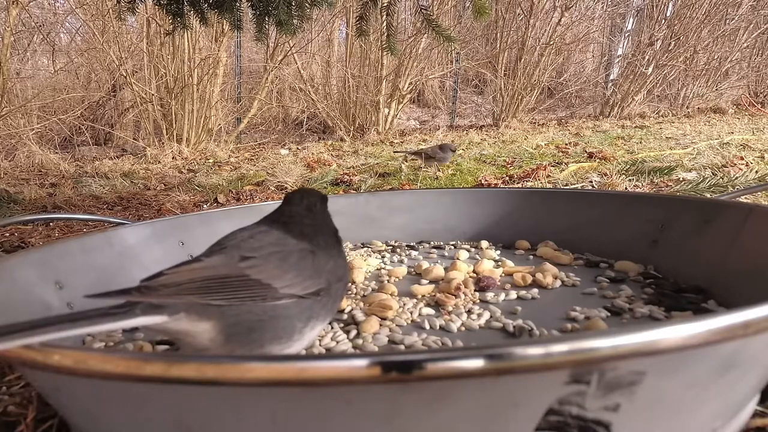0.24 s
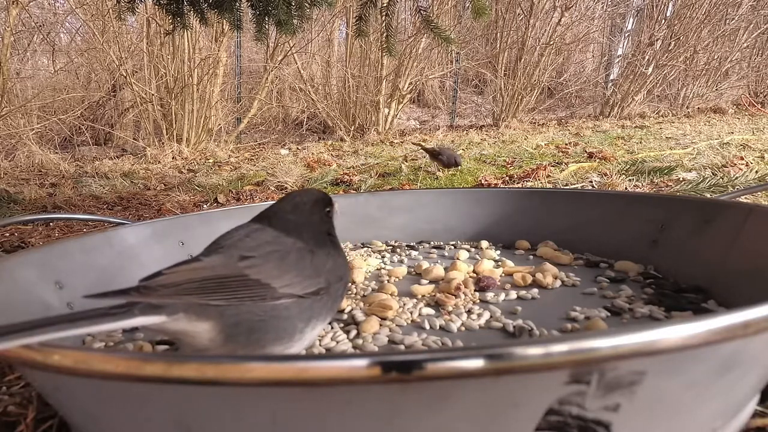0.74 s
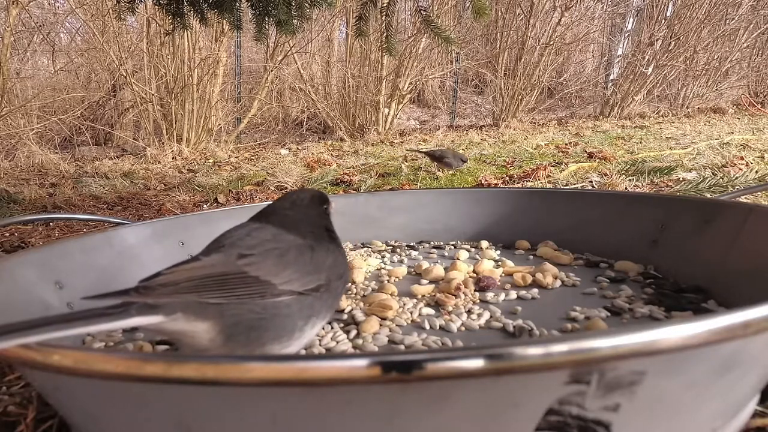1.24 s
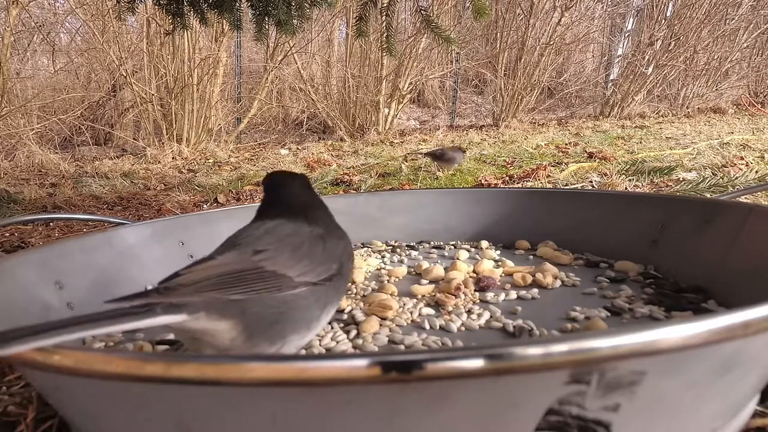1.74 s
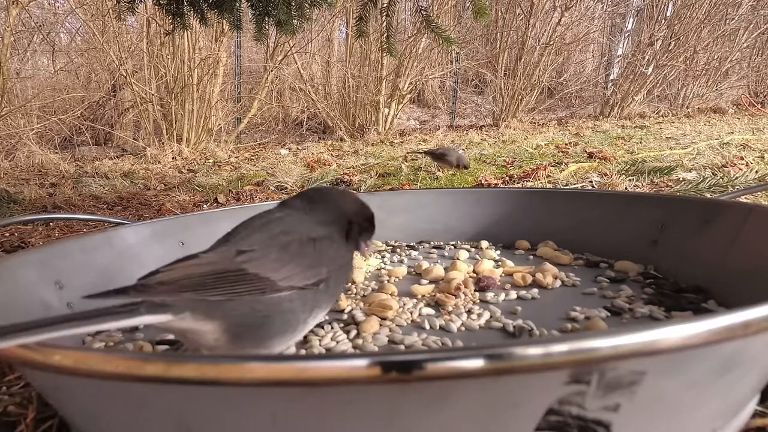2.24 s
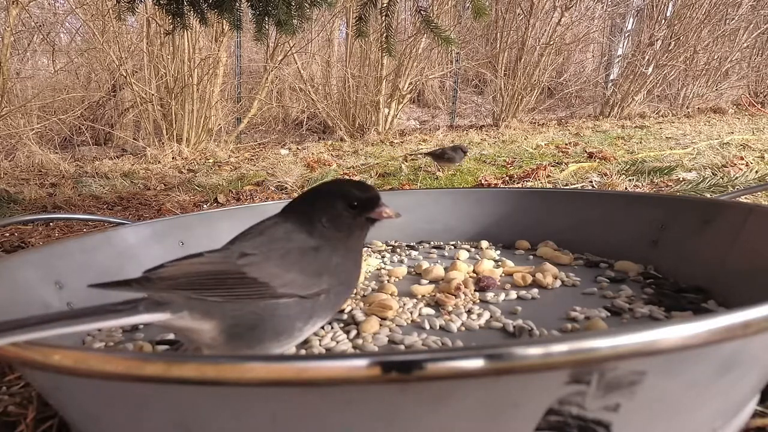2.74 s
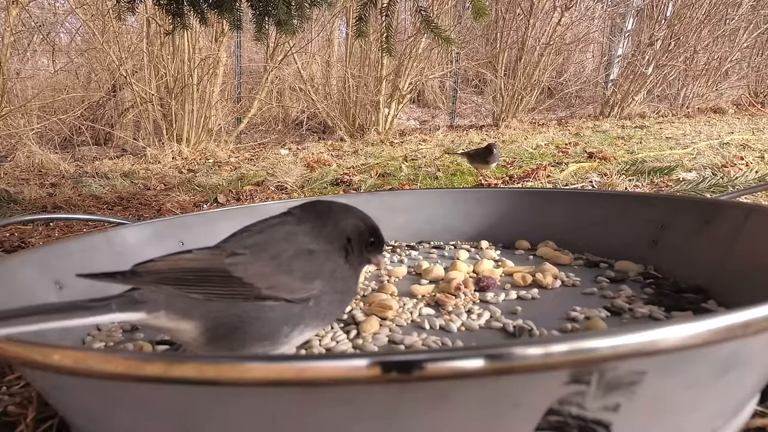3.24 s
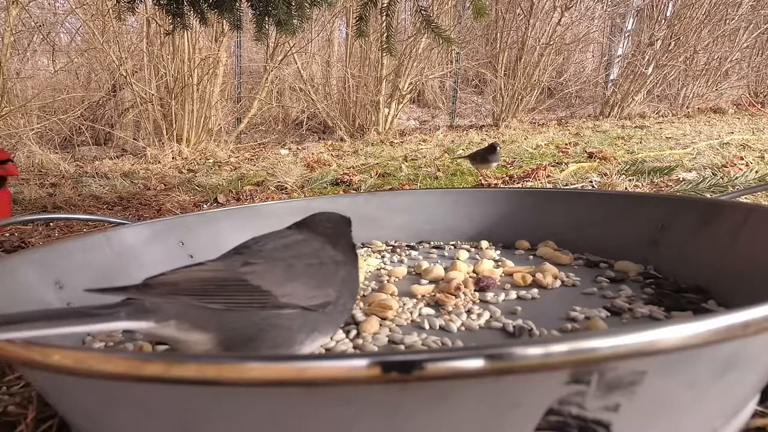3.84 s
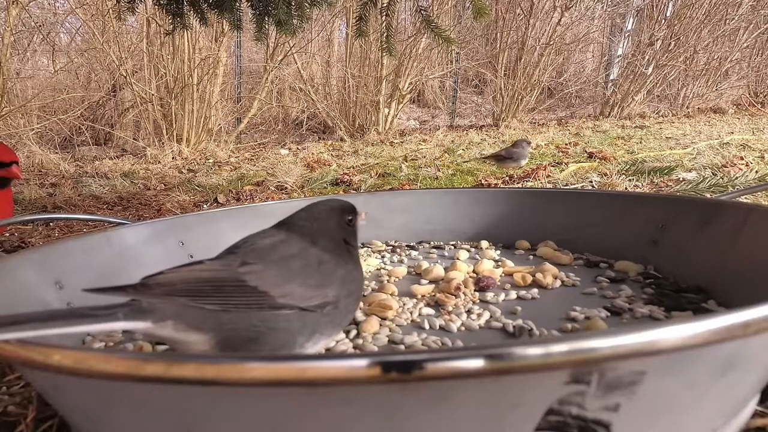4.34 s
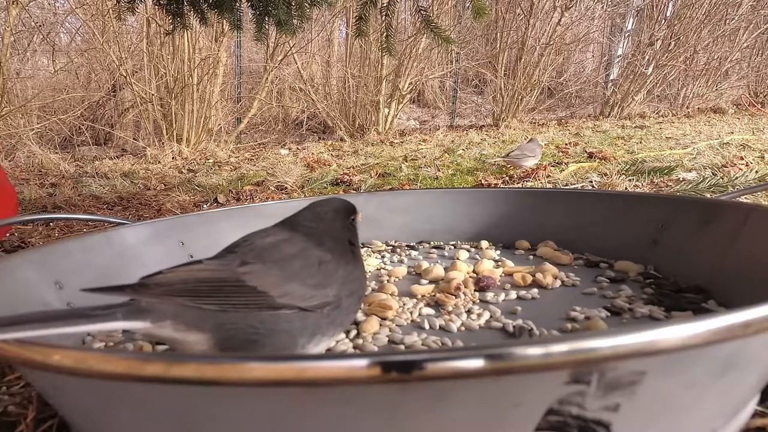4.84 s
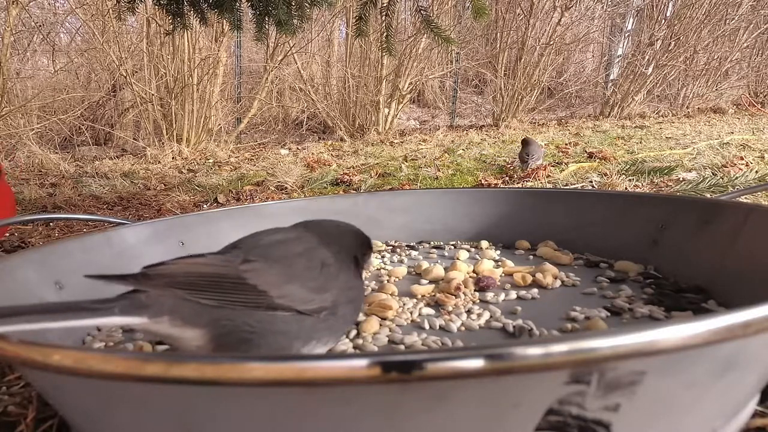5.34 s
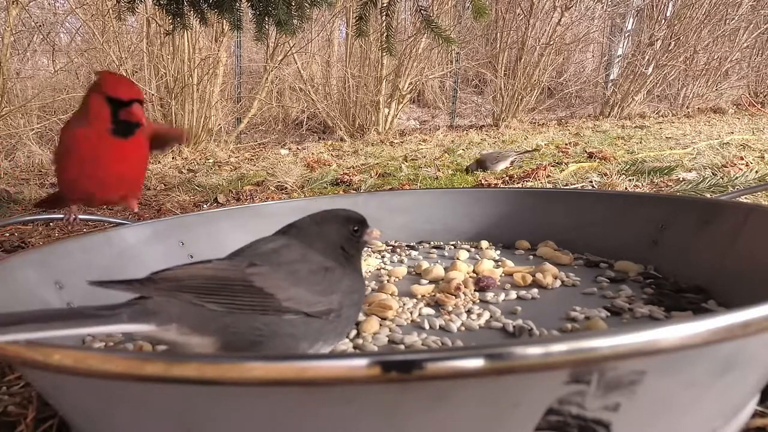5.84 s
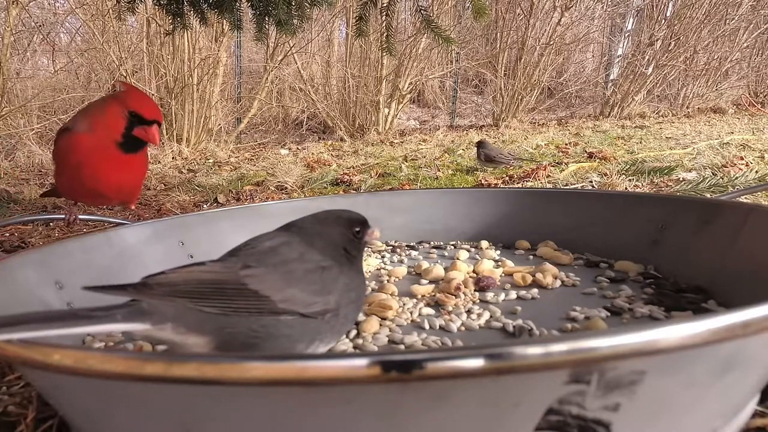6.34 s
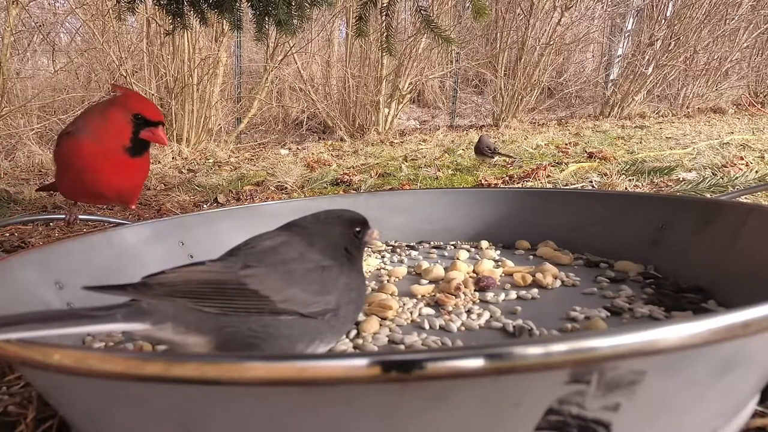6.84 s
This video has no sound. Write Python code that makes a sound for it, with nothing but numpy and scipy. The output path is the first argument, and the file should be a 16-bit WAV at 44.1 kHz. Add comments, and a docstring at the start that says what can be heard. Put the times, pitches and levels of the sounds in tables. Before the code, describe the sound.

Outdoors in a quiet yard, close stereo microphone. A small bird by a metal feeding bowl gives two sharp chips and two quick falling whistles, then seeds tick and rustle and the bowl is knocked once. More chips lead into a run of eight slurred whistles. A hard click cuts in, then final chips and one short buzzy warble from a second bird. Distant motor hum, road rumble and hiss continue underneath.

```python
"""Songbird at the feeding bowl

Close to a stereo microphone a songbird by a metal bowl sings sharp chips and down-slurred whistles, built as
harmonic stacks on gliding pitches; a second bird gives one buzzy warble, a whistle swinging fast in pitch.
Noise bursts and grains make ticks and rustle; damped modes ring the bowl when it is knocked once.
Behind: a distant motor hums in sine orders over road rumble, hiss and a thin whine; low noise swells at the end.
"""
import sys
import numpy as np
from scipy import signal
from scipy.io import wavfile
from scipy.ndimage import uniform_filter1d

SR = 44100
rng = np.random.default_rng(int(sys.argv[2]) if len(sys.argv) > 2 else 0)


def log_audio(samples):
    """Write samples as a 16-bit WAV file to the path given in sys.argv[1]."""
    # one column per channel
    frames = np.atleast_2d(samples).T
    # limit to full scale, then quantise
    limited = np.clip(frames, -1, 1)
    pcm = np.round(limited * 32767).astype(np.int16)
    wavfile.write(sys.argv[1], SR, pcm)


N = 312669

# Course of one slur and one chip. Each row: time after onset in s, pitch in Hz, fundamental in dB, overtones in dB.
SLUR_SHAPE = [(-.003, 6440, -10, -40), (-.001, 5970, 12, 2), (.002, 4200, 6, -3), (.006, 2400, 6.5, -6),
              (.012, 2063, -8.5, -1.5), (.026, 1890, -1.2, -4.5), (.058, 1712, -1.5, -5),
              (.071, 1591, -5, -6.5), (.09, 1090, -13, -14), (.099, 1020, -9.5, -17), (.105, 932, -28, -32)]
CHIP_SHAPE = [(-.002, 10730, -28, -50), (.0001, 9020, -0.5, -6), (.002, 6733, 4, 2), (.005, 3420, -5, 0),
              (.008, 1834, -27.5, -47), (.011, 1600, -14.5, -3), (.017, 1235, -25.5, -24),
              (.023, 1280, -52, -50)]
# Notes sung. Each row: onset in s, level in dB, time stretch, pitch factor at the start, pitch factor at the end,
# overtones in dB, overtone tilt in dB per order.
SLUR_NOTES = [(1.474, -36, 1, 1.02, 1.03, -0.5, -1), (1.6406, -35, .93, 1.004, 1.07, -0.7, -0.1),
              (3.8448, -35, .95, 0.98, 1.066, -2.3, 2.5), (4.0025, -34.5, .95, 0.99, 1.07, -0.5, 2),
              (4.1608, -33.5, .97, 0.97, 1.042, -1.2, 0.2), (4.3258, -33.5, .96, 0.99, 1.046, -1, .4),
              (4.5262, -36, 1, .99, 1.008, -7, -2), (4.6935, -34.5, 1.006, 0.99, 1.001, -4, -1),
              (4.8868, -36, 1.03, 0.96, 1.01, -4, -0.8), (5.0905, -36, 1.03, 0.98, 1.02, -1.5, 0.9)]
CHIP_NOTES = [(1.3159, -28, 1, 1.02, 1.16, -3, 5), (1.3907, -31, 1.2, 1.15, 0.98, 2.5, 3),
              (3.1657, -31, 0.97, 0.71, 1.22, -7.5, -3), (3.3208, -27, 0.96, .92, 1.1, -1.5, -1.1),
              (3.705, -31.5, .97, .98, 1.04, 4, -0.5), (3.7737, -30, 1.001, 0.96, 1.01, 3, 3),
              (5.9009, -28.5, 1, .98, 1.03, -10, .6), (5.9863, -26, .91, 1.01, 1.04, -.6, -2),
              (6.341, -30, 1.06, 0.86, 1.03, -1, -.4), (6.6754, -32.5, 0.97, 0.94, 1.02, 2, -1)]
# Balance of the overtones. Each entry: dB of order 2, 3, 4, 5; the fifth also serves the orders above.
SLUR_OVERTONES_DB = [-2.3, 3, -3.5, -3.5]
CHIP_OVERTONES_DB = [-6.5, -11, -23, -21]
# Depth of the overtones' wavering as the throat shifts. Entries: dB at the start, middle and end of a note.
WAVER_DB = [2.0, 2.5, 8.0]
# Throat and path to the microphone. Each row: frequency in Hz, gain in dB, left minus right in dB.
VOICE_COLOUR = [(900, 3.5, 4.5), (1930, -0.5, -4.5), (2600, -9.5, -4.5), (3270, -5, -1.5), (3870, 3.5, 5.5),
                (4730, -11.5, -3), (5250, -5, 2.5), (5650, -14, 2), (6000, -5, 1.5), (7560, -2.5, -3),
                (8240, 4.5, 15.5), (8890, -1.5, -9), (11600, -23.5, -19), (13900, -18, -4),
                (16200, -19, 13)]
# The singer shifts its perch. Each row: time in s, treble phase lead of the left channel in radians.
PERCH_LEAD = [(1.5, 1.08), (3.2, 0.64)]
# Echoes off bowl and ground, before the treble filter. Each row: delay in s, left in dB, right in dB.
SONG_ECHOES = [(.00043, -6, -9), (.002, -10, -12), (.0037, -18, -15)]
# Echoes of the warble, before the treble filter. Each row: delay in s, left in dB, right in dB.
WARBLE_ECHOES = [(.0009, -12, -14), (.0021, -16, -14)]
# Seed and claw ticks. Each row: start in s, peak in dB, pitch of the band in Hz, 60 dB decay in s,
# left minus right in dB.
SEED_TICKS = [(0.4217, -29.5, 3500, 0.0059, -2), (0.8462, -40.5, 7100, 0.016, -1.1),
              (1.189, -39.5, 5600, 0.011, 2), (2.562, -51.5, 2600, .024, -7), (2.684, -47, 3200, 0.022, -7),
              (2.734, -51, 2400, .015, -3), (2.826, -50.5, 3000, 0.012, -4),
              (2.8794, -50, 6020, 0.019, -1.5), (2.99, -45, 2400, 0.024, -1.5),
              (3.1008, -36, 6600, 0.031, 5), (3.122, -43.5, 5000, 0.031, .5),
              (3.2231, -46, 2714, 0.017, .5), (3.3024, -46, 8000, .02, 11), (3.3524, -47, 3100, 0.024, 2),
              (3.4232, -51.5, 8000, 0.009, 11), (4.9516, -15.5, 7620, 0.0017, 0.5),
              (5.8446, -49.5, 2480, 0.019, .1), (5.896, -37, 2500, 0.01, 3), (6.329, -45, 6000, .012, .1)]
# Knock on the bowl and its bounces. Each row: start in s, blow in dB, softening frequency of the contact in Hz.
BLOWS = [(3.4956, -20, 1500), (3.4982, -15.5, 700), (3.5023, -23, 6000), (3.5054, -36, 6000),
         (3.5115, -32, 3000)]
# Modes of the bowl. Each row: frequency in Hz, relative level in dB, 60 dB decay in s.
BOWL_MODES = [(355, -8, 0.075), (486, 3, 0.014), (720, 3, 0.01), (780, 1.5, 0.016), (970, 1, 0.013),
              (1085, -2, 0.044), (1190, 1.5, 0.032), (1430, -3, 0.033), (1585, -7, .03), (1914, 0, .03),
              (2400, 0, 0.04), (4200, -5, .04), (4400, 4, 0.042)]
# Rustle of seeds and leaves. Each row: time in s, level in dB.
RUSTLE_LEVEL = [(0, -79.5), (2.2, -75.5), (2.65, -65.5), (2.85, -75.5), (3.2, -62.5), (3.4, -73),
                (3.7, -69.5), (5.5, -76), (7.09, -77)]
# Distant motor. Each row: time in s, turning rate in Hz, level in dB, lift of the orders above the third in dB.
MOTOR_COURSE = [(0, 41.73, -55, 0), (2.96, 41.96, -54.5, -0.8), (4.2, 41.58, -57, 0.2),
                (6.1, 41.36, -59.5, 7.5), (6.78, 40.8, -58.5, 9), (7.0, 40.92, -58, 9.5)]
# Motor orders. Each row: multiple of the turning rate, relative level in dB.
MOTOR_ORDERS = [(2, -6.5), (3, 0), (4, -17), (5, -6.5), (6, -16.5), (7, -19.5), (9, -18)]
# Road rumble over time. Each row: time in s, level in dB.
ROAD_LEVEL = [(0, -60.5), (2.0, -60), (2.45, -58), (3.3, -61), (4.4, -57.5), (4.7, -60.5), (5.65, -58.5),
              (6.5, -61), (7.09, -59)]
# Spectra of road and hiss, relative. Each row: frequency in Hz, density in dB per Hz.
ROAD_COLOUR = [(12, -58), (20, -12), (32, -23), (56, -13.5), (125, -8.5), (167, -9.5), (214, -4),
               (250, -7.5), (389, -9), (540, -15), (2000, -35.5), (2600, -78), (4400, -120)]
HISS_COLOUR = [(590, -46), (1000, -3), (3900, -6), (4850, -8), (7070, -6.5), (12400, -6), (14900, -14),
               (15400, -15)]
# Likeness of the two channels in road and hiss. Each row: frequency in Hz, left-right correlation.
LIKENESS = [(60, 0.95), (130, 0.88), (290, 0.88), (640, 0.78), (1410, -0.16), (3100, -0.24), (6820, 0.4),
            (15000, 0.27)]
# Low rumble that swells. Each row: time in s, level in dB.
SWELL_LEVEL = [(0, -85), (6.6, -80), (6.88, -63), (7.0, -55), (7.09, -52)]

SLUR_PAN_DB, CHIP_PAN_DB = -1.5, -2.1   # left minus right
HIGH_OVERTONE_SLOPE_DB = -2.5           # per order above the fifth
RASP_DB = -12                           # airflow noise of the syrinx against the overtone course
LEAD_FULL_HZ = 3200                     # the left lead grows with frequency up to here
WARBLE_START_S, WARBLE_TOP_S, WARBLE_END_S = 6.1555, 6.1634, 6.249   # TOP: end of the opening glide
WARBLE_HITCH_S = 6.1737                 # one downswing turns back early
WARBLE_SWINGS_PER_S, WARBLE_SLOWING_PER_S2 = 125.3, 200
WARBLE_TOP_HZ, WARBLE_WANDER_HZ = 8540, 110
WARBLE_FIRST_HZ, WARBLE_FLOOR_HZ, WARBLE_SETTLE_S = 6280, 7100, 0.015   # the dips climb towards the floor
WARBLE_DB, WARBLE_DIP_DB, WARBLE_OCTAVE_DB, WARBLE_PUFF_DB = -22, -2.5, -27, -17
WARBLE_ATTACK_S, WARBLE_RELEASE_S = 0.011, 0.024
PATTER_FROM_S, PATTER_GAP_S, PATTER_COUNT = 2.47, .05, 5
PATTER_DB, PATTER_HZ, PATTER_T60_S, PATTER_PAN_DB = -55, 2800, 0.027, -14
RATTLE_DB, RATTLE_T60_S = -34, 0.073
SONG_WET_DB, WARBLE_WET_DB, BOWL_WET_DB = -6, -12, -5   # diffuse tail, before its treble filter
YARD_T60_S, YARD_LOW_HZ = .045, 2800
HISS_DB = -66.5
WHINE_HZ, WHINE_DB, WHINE_PAN_DB, WHINE_LEAD_RAD = 15704, -56, -7, 2.15
MAINS_HZ, WHINE_BUZZ = 60, .2           # rate and depth of the mains modulation
MIC_TOP_HZ, CUTOFF_HZ = 16100, 16650


def song(notes, shape, orders_db, pan_db):
    """The close singer: every note is a stack of nine harmonics on one glide, coloured by throat and path."""
    out = np.zeros((2, N))
    after, hz, first_db, rest_db = np.transpose(shape)
    waver = [np.minimum(drift(50), .6) for _ in range(9)]
    for s, level_db, stretch, start, end, over_db, tilt_db in notes:
        t = np.arange(after[0] * stretch, after[-1] * stretch, 1 / SR)
        glide = np.exp(np.interp(t / stretch, after, np.log(hz)))
        pitch = uniform_filter1d(np.linspace(start, end, len(t)) * glide, size=30)
        phase = 2 * np.pi * np.cumsum(pitch) / SR
        overtone_db = np.interp(t / stretch, after, rest_db)
        waver_depth = np.interp(t, np.linspace(t[0], t[-1], 3), WAVER_DB)
        perch_lead = np.interp(s, *np.transpose(PERCH_LEAD))
        first = round(s * SR)
        note = 0
        for k in range(1, 10):
            if k == 1:
                db = np.interp(t / stretch, after, first_db)
            else:
                order = min(k, 5)
                db = overtone_db + over_db + tilt_db * (order - 3) + orders_db[order - 2]
                db += HIGH_OVERTONE_SLOPE_DB * max(k - 5, 0)
                db += waver_depth * waver[k - 1][first:first + len(t)]
            partial_hz = k * pitch
            level = amp(db + at_hz(VOICE_COLOUR, partial_hz)) * (partial_hz < .4 * SR)
            sides = panned(level, pan_db + at_hz(VOICE_COLOUR, partial_hz, axis=2))
            lead = perch_lead * np.minimum(partial_hz / LEAD_FULL_HZ, 1)
            note = note + sides * np.sin(k * phase + [lead, 0 * lead])
        note += amp(RASP_DB + overtone_db) * airflow(len(t))
        add(out, amp(level_db) * note, s + t[0])
    return out


def airflow(count):
    """Breath noise in the band of the throat, partly different in each channel."""
    noise = rng.standard_normal(count) + .5 * rng.standard_normal((2, count))
    return bandpass(noise, 2400, 12500)


def warble():
    """The second bird: a whistle glides up, then swings ever slower between tops and slightly weaker dips."""
    t = np.arange(WARBLE_START_S, WARBLE_END_S, 1 / SR)
    age, since_top = t - WARBLE_START_S, t - WARBLE_TOP_S
    turn = WARBLE_SWINGS_PER_S * since_top - WARBLE_SLOWING_PER_S2 * since_top ** 2 / 2
    # jump to the mirrored point of the swing: pitch is continuous, its direction flips
    turn += (t > WARBLE_HITCH_S) * (1 - 2 * (np.interp(WARBLE_HITCH_S, t, turn) % 1))
    turn = np.where(since_top < 0, .5 * since_top / since_top[0], turn)
    down = .5 - .5 * np.cos(2 * np.pi * turn)   # 0 at the tops, 1 in the dips
    top = WARBLE_TOP_HZ + WARBLE_WANDER_HZ * drift(36)[:len(t)]
    dip = WARBLE_FLOOR_HZ + (WARBLE_FIRST_HZ - WARBLE_FLOOR_HZ) * np.exp(-age / WARBLE_SETTLE_S)
    phase = 2 * np.pi * np.cumsum(top * (1 - down) + dip * down) / SR
    tone = np.sin(phase) + amp(WARBLE_OCTAVE_DB) * np.sin(2 * phase)
    tone += amp(WARBLE_PUFF_DB - 60 * age / .07) * airflow(len(t))[0]   # puff of breath at the start
    fade = np.minimum(age / WARBLE_ATTACK_S, (WARBLE_END_S - t) / WARBLE_RELEASE_S)
    envelope = np.sqrt(np.clip(fade, 0, 1))
    level = amp(WARBLE_DB + WARBLE_DIP_DB * down + drift(60)[:len(t)])
    out = np.zeros((2, N))
    add(out, panned(tone * envelope * level, -0.44), t[0])
    return out


def ticks(rows):
    """Seeds and claws: short dying noise bursts with a click at the front, in a broad band."""
    out, t = np.zeros((2, N)), np.arange(2000) / SR
    for s, db, hz, t60, pan_db in rows:
        burst = (rng.standard_normal(2000) + 2.2 * (t == 0)) * amp(-60 * t / t60)
        burst = bandpass(burst, hz / 5.3, min(hz * 2.28, .4 * SR))
        add(out, panned(amp(db) * burst / np.abs(burst).max(), pan_db), s)
    return out


def patter():
    """A run of faint ticks as feet shift, uneven in time, size and colour; gives rows for ticks()."""
    rows = []
    for k in range(PATTER_COUNT):
        late, louder, brighter = rng.standard_normal(3)
        s = PATTER_FROM_S + PATTER_GAP_S * (k + .25 * late)
        hz = PATTER_HZ * np.exp(.2 * brighter)
        rows.append((s, PATTER_DB + 1.5 * louder, hz, PATTER_T60_S, PATTER_PAN_DB))
    return rows


def knock():
    """Blows ring the damped modes of the bowl while decaying noise rattles the seeds on it."""
    out, t = np.zeros((2, N)), np.arange(8000) / SR
    for s, blow_db, soft_hz in BLOWS:
        for hz, db, t60 in BOWL_MODES:
            mode_db = blow_db + db - 15.5 + rng.normal(0, 2)
            ring = amp(mode_db - 60 * t / t60) * np.sin(2 * np.pi * hz * t)
            ring /= 1 + (hz / soft_hz) ** 2   # a soft contact leaves the high modes quiet
            add(out, panned(ring, 3.5 + rng.normal(0, 1.0)), s)
    noise = rng.standard_normal(8000) + 1.87 * rng.standard_normal((2, 8000))
    rattle = signal.lfilter([1, -1], np.convolve([1, -.6], [1, -.96]), noise)
    envelope = amp(RATTLE_DB - 60 * t / RATTLE_T60_S) * (1 - np.exp(-t / 0.0034))
    add(out, envelope * rattle, BLOWS[0][0])
    return signal.sosfilt(signal.butter(2, 120, "high", fs=SR, output="sos"), out)


def rustle():
    """Seeds and leaves: clumped tiny grains of uneven size in a broad mid band."""
    chance = 3500 * amp(5 * drift(25)) / SR   # of a grain at each sample
    born = rng.random((2, N)) < chance
    mid, side = born * rng.standard_normal((2, N))
    grains = bandpass(mid + .5 * side * [[1], [-1]], 1200, 6000)
    return amp(in_time(RUSTLE_LEVEL)[0]) * rms_one(grains)


def outdoors(x, wet_db, echoes=()):
    """Yard: near echoes and a short diffuse tail, separate per channel; small surfaces return only the treble."""
    t = np.arange(6000) / SR
    tail = rng.standard_normal((2, 6000)) / np.sqrt(YARD_T60_S * SR / 14)
    response = amp(wet_db - 60 * t / YARD_T60_S) * tail
    for delay, left_db, right_db in echoes:
        response[:, round(delay * SR)] += amp([left_db, right_db])
    response = signal.lfilter(*signal.butter(2, YARD_LOW_HZ, "high", fs=SR), response)
    response[:, 0] = 1   # direct sound
    return signal.fftconvolve(x, response, axes=1)[:, :N]


def motor():
    """The distant motor: sine orders of its turning rate, each wavering in level and phase."""
    rate, level_db, lift_db = in_time(MOTOR_COURSE)
    phase = 2 * np.pi * np.cumsum(rate) / SR
    hum = 0
    for k, db in MOTOR_ORDERS:
        level = amp(db + lift_db * (k > 3) + .8 * drift(3))
        hum = hum + level * np.sin(k * phase + .3 * drift(2) + 6 * rng.random())
    return panned(np.sqrt(2) * amp(level_db) * hum, 0.25)


def road():
    """Road rumble: patchy low noise under a moving level, a little stronger on the left."""
    return amp(in_time(ROAD_LEVEL)[0]) * banded_noise(ROAD_COLOUR, patchy_db=2.5) * amp([[.7], [-.7]])


def swell():
    """A low rumble swells: noise in a low band under a rising level."""
    noise = rng.standard_normal(N) + 0.21 * rng.standard_normal((2, N))
    return amp(in_time(SWELL_LEVEL)[0]) * rms_one(bandpass(noise, 220, 500, order=4))


def hiss():
    """Nearly steady broadband noise behind everything."""
    return amp(HISS_DB) * banded_noise(HISS_COLOUR, patchy_db=.3)


def whine():
    """A thin electronic tone under mains buzz, flickering, unequal in the two channels."""
    t = np.arange(N) / SR
    offsets = [WHINE_LEAD_RAD + 0.52 * drift(18), 0.5 * drift(19)]
    phase = 2 * np.pi * WHINE_HZ * t + offsets
    buzz = 1 + WHINE_BUZZ * np.sin(2 * np.pi * MAINS_HZ * t)
    return panned(amp(WHINE_DB + 1.6 * drift(30)) * buzz, WHINE_PAN_DB) * np.sin(phase)


def banded_noise(spectrum, patchy_db):
    """Half-octave bands of stereo noise, each with its own level, flicker and channel likeness; rms 1."""
    out, edges = 0, 20 * 2 ** np.arange(0, 10, .5)
    white = rng.standard_normal((2, 2, N))   # neighbouring bands draw on different noise
    for k, (low, high) in enumerate(zip(edges, np.append(edges[1:], 18000))):
        hz = np.sqrt(low * high)
        if spectrum[0][0] < hz < spectrum[-1][0] * 1.2:
            mid, side = bandpass(white[k % 2], low, high)
            alike = np.clip(at_hz(LIKENESS, hz), -1, 1)
            gain = amp(at_hz(spectrum, hz) + patchy_db * drift(6.8))
            out = out + gain * (np.sqrt(1 + alike) * mid + np.sqrt(1 - alike) * side * [[1], [-1]])
    return rms_one(out)


def drift(rate):
    """Slow chance of spread 1: noise through two equal poles at rate Hz, run at a fortieth of SR."""
    r = np.exp(-2 * np.pi * rate * 40 / SR)
    slow = signal.lfilter([1], [1, -2 * r, r * r], rng.standard_normal(N // 40 + 2002))[2000:]
    return np.interp(np.arange(N) / 40, np.arange(len(slow)), rms_one(slow))


def bandpass(x, low, high, order=2):
    """Butterworth band from low to high Hz."""
    return signal.sosfilt(signal.butter(order, [low, high], "band", fs=SR, output="sos"), x)


def amp(db):
    """dB to gain."""
    return 10 ** (np.asarray(db) / 20)


def rms_one(x):
    """Scale to rms 1."""
    return x / np.sqrt(np.mean(x ** 2) + 1e-20)


def in_time(rows):
    """Columns of a curve at every sample."""
    s, *columns = np.transpose(rows)
    return [np.interp(np.arange(N) / SR, s, c) for c in columns]


def at_hz(points, hz, axis=1):
    """Read a column of a spectrum on a log frequency axis."""
    points = np.array(points)
    return np.interp(np.log(hz), np.log(points[:, 0]), points[:, axis])


def panned(x, pan_db):
    """Mono to two channels, left minus right in dB."""
    return np.array([x * amp(pan_db / 2), x * amp(-pan_db / 2)])


def add(out, x, s):
    """Mix x into out from time s."""
    i = int(round(s * SR))
    out[..., i:i + x.shape[-1]] += x[..., :N - i]


def scene():
    """Birds and bowl close by in the yard; motor, road, swell, hiss and whine behind."""
    singer = song(SLUR_NOTES, SLUR_SHAPE, SLUR_OVERTONES_DB, SLUR_PAN_DB)
    singer += song(CHIP_NOTES, CHIP_SHAPE, CHIP_OVERTONES_DB, CHIP_PAN_DB)
    birds = outdoors(singer, SONG_WET_DB, SONG_ECHOES) + outdoors(warble(), WARBLE_WET_DB, WARBLE_ECHOES)
    bowl = outdoors(ticks(SEED_TICKS + patter()) + knock(), BOWL_WET_DB) + rustle()
    return birds + bowl + motor() + road() + swell() + hiss() + whine()


def record(dry):
    """The microphone falls off at the very top, then the band is cut."""
    mic = signal.sosfilt(signal.cheby2(8, 22, MIC_TOP_HZ + 150, fs=SR, output="sos"), dry)
    return signal.sosfilt(signal.cheby2(16, 60, CUTOFF_HZ + 100, fs=SR, output="sos"), mic)


dry = scene()
out = record(dry)
log_audio(out)
```